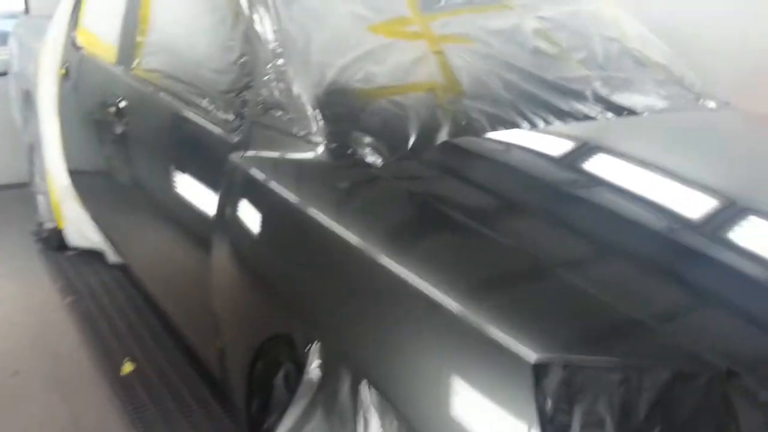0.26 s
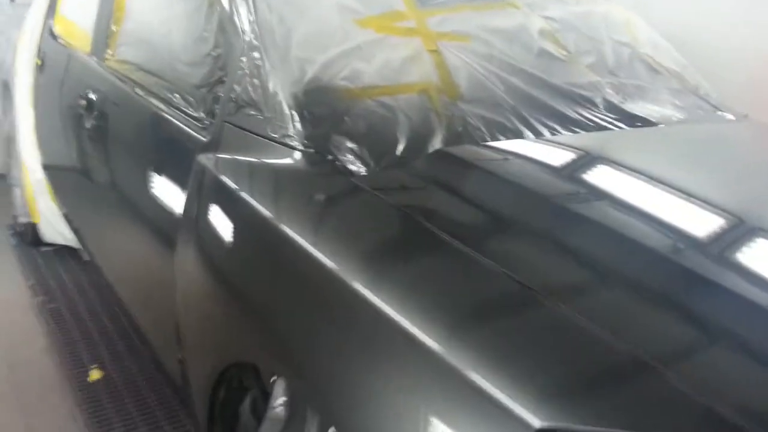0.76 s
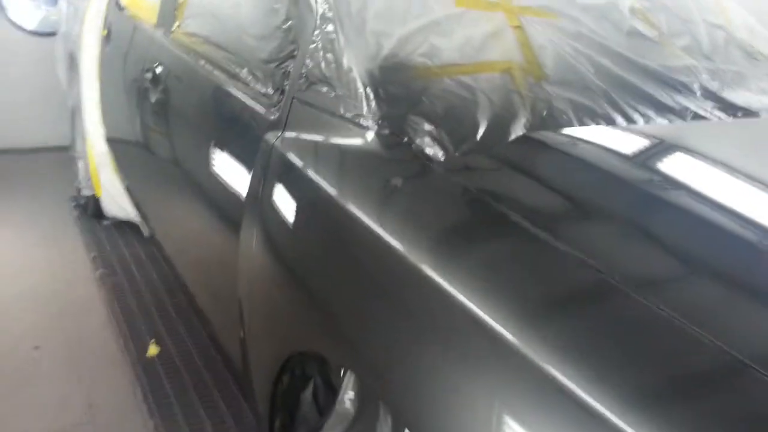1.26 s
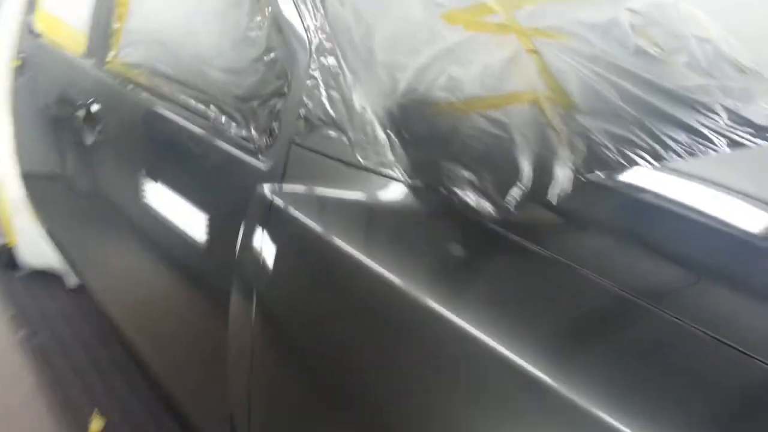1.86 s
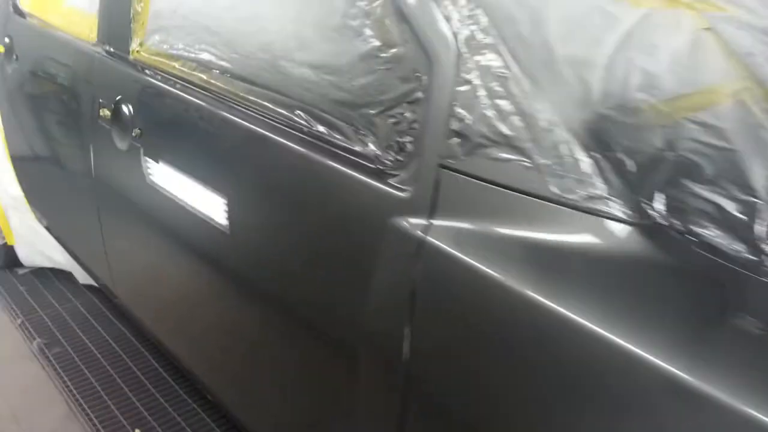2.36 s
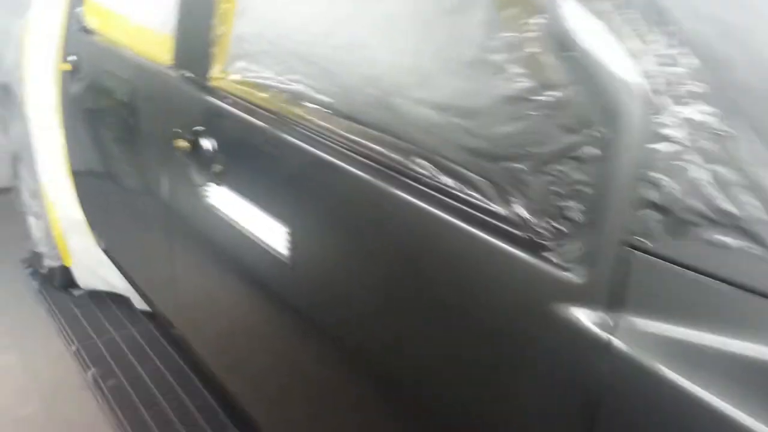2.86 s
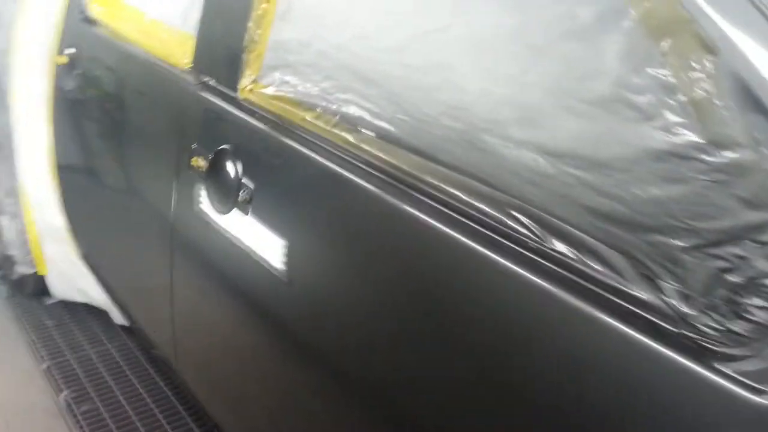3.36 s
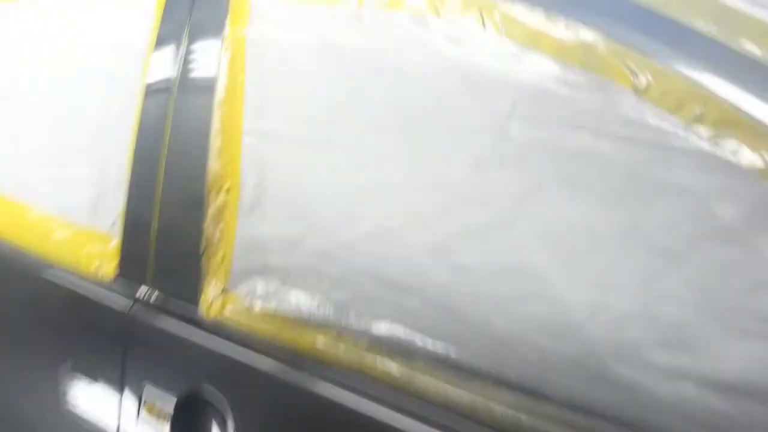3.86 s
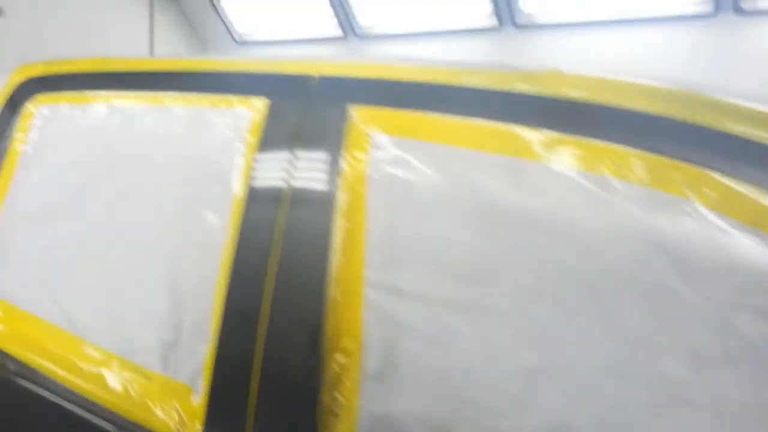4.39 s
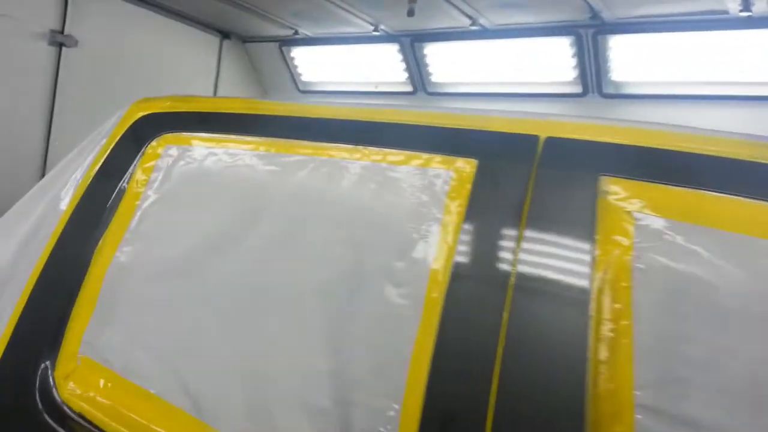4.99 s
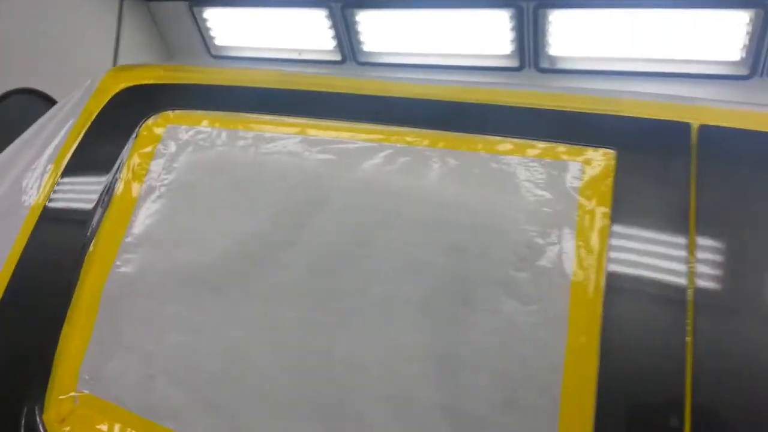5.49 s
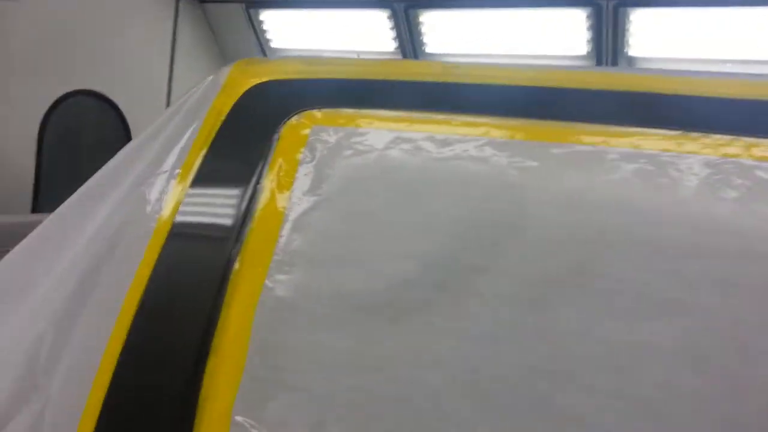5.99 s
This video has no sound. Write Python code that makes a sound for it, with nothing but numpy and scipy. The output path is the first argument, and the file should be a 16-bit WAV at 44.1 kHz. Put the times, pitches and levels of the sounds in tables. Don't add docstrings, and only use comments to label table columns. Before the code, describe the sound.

A steady, loud, dull rush of ventilation air with a wavering low hum fills a spray booth; one sharp plastic click near the start.

```python
import sys
import numpy as np
from scipy import signal
from scipy.io import wavfile
from scipy.ndimage import uniform_filter1d

SR = 44100
rng = np.random.default_rng(int(sys.argv[2]) if len(sys.argv) > 2 else 0)


def nominal_scale(level):
    x = np.asarray(level, float) / 20
    return 10 ** x


def generate_wav(signal):
    frames = np.transpose(np.atleast_2d(signal))
    scaled = np.clip(frames, -1, 1) * 32767
    pcm = np.round(scaled).astype(np.int16)
    wavfile.write(sys.argv[1], SR, pcm)


N = 275184

# start_s [s], level_db [dB]
CLICKS = [
    (.1928, -19),
    (.1976, -2),
]


def evened(x):
    return x / np.sqrt(np.mean(x ** 2) + 1e-20)


def read(hz, f, value):
    return np.interp(np.log(hz + 1), np.log(np.asarray(f) + 1), value)


def add(mix, start_s, sound):
    part = mix[round(start_s * SR):][:len(sound)]
    part += sound[:len(part)]


def resonate(x, hz, width_hz):
    turn = np.exp(2j * np.pi * hz * np.arange(len(x)) / SR)
    r = np.exp(-np.pi * width_hz / SR)
    once = signal.lfilter([1 - r], [1, -r], x / turn)
    twice = signal.lfilter([1 - r], [1, -r], once)
    return 2 * (turn * twice).real


def rush(level_db=-15, patchy_db=1.16, flutter_db=0.4):
    # freq_hz [Hz], density_db [dB per Hz]
    left_air = [(15, -80), (32, -75), (55, -56.5), (100, -50.5), (150, -44), (300, -40), (500, -45),
                (850, -46), (1100, -50), (1900, -57), (3100, -77.5), (4000, -82), (7000, -83),
                (11000, -113.5), (12500, -126)]
    right_air = [(15, -75), (32, -72), (55, -51), (100, -51), (150, -41.5), (300, -42), (500, -47),
                 (750, -48), (1100, -54.5), (2000, -66), (3200, -78), (5000, -85), (8000, -87.5),
                 (11000, -99), (12500, -118)]
    # peak_hz [Hz], width_hz [Hz]
    cavities = [(5600, 2180), (7500, 1560)]
    # freq_hz [Hz], likeness [0-1], right_lead_rad [rad]
    pair = [(30, .99, -.2), (130, .99, -.1), (250, .95, -.05), (350, .83, 0), (500, .6, .3), (650, .7, .35),
            (850, .38, .7), (1100, .3, 1.5), (1500, .43, 3.1), (1950, .12, 4.5), (2300, .27, 6.1),
            (2800, .1, 7.5), (3400, .17, 9.4), (4500, .05, 12)]
    # time_s [s], height [0-1]
    height = [
        (0, 0.4),
        (1.5, 0.58),
        (2.5, 0.72),
        (3.7, 0.88),
        (4.5, 0.86),
        (6.24, .95),
    ]
    # freq_hz [Hz], gain_db [dB]
    shade = [(70, -3), (240, 2.4), (600, -4), (1200, -2.5), (2200, -4.5), (6000, -3.5)]

    frames, hz = N // 512 + 5, np.fft.rfftfreq(2048, 1 / SR)
    t_s = np.arange(frames) * 512 / SR
    a, b, c, d, patches = rng.standard_normal((frames, 1025, 5)).T
    patches = uniform_filter1d(patches, size=6, axis=0)
    patches = evened(uniform_filter1d(patches, size=16, axis=1))
    flutter = evened(uniform_filter1d(rng.standard_normal(frames), size=2))

    lowness = .5 - np.interp(t_s, *np.transpose(height))
    walk_db = np.outer(read(hz, *np.transpose(shade)), lowness)

    f, like, lead_rad = np.transpose(pair)
    like = np.clip(read(hz, f, like), 0, 1)[:, None]
    lead = np.exp(1j * read(hz, f, lead_rad))[:, None]
    left = a + 1j * b
    right = like * lead * left + np.sqrt(1 - like ** 2) * (c + 1j * d)

    air = nominal_scale(np.array([read(hz, *np.transpose(table)) for table in (left_air, right_air)]))
    cavity = np.array([1 / abs(1 - (hz / peak_hz) ** 2 + 1j * hz * width_hz / peak_hz ** 2)
                       for peak_hz, width_hz in cavities])
    treble = np.clip(hz / 5000, 0, 1)[:, None]
    gain_db = walk_db + patchy_db * patches + flutter_db * treble * flutter
    spectra = np.array([left, right]) * (air * cavity)[:, :, None] * nominal_scale(gain_db)
    sound = signal.istft(spectra, nperseg=2048, noverlap=1536)[1][:, :N]
    return nominal_scale(level_db) * evened(sound)


def hum():
    # freq_hz [Hz], width_hz [Hz], rest_db [dB between antinodes]
    modes = [(160, 16.6, -38.5), (245.5, 26, -43), (632.2, 24.3, -37.5), (828, 25, -44.5),
             (211.6, 15, -38.5), (1236, 79, -46), (371, 32, -38), (734, 44, -42.5)]
    # centre_s [s], half_s [s], level_db [dB]
    antinodes = [
        [(.4, 0.53, -27.5), (.95, 0.13, -29.5), (2.5, 0.34, -26), (3.9, 0.56, -27), (5.05, 0.22, -21.5),
         (5.8, .3, -28)],
        [(1.35, 0.37, -18), (2.45, 0.14, -23), (3.15, 0.34, -17), (4.2, 0.18, -20), (5.8, 0.099, -16)],
        [(.48, 0.1, -25.5), (3.0, 0.22, -33), (4.4, 0.38, -30), (5.1, 0.37, -26.5), (5.7, 0.17, -22)],
        [(.3, 0.19, -31.5), (1.45, 0.21, -26), (3.6, 0.39, -36)],
        [(.15, .2, -24.5), (2.3, 0.31, -20.5), (4.2, 0.35, -25.5), (5.45, 0.067, -21.5)],
        [(3.6, .2, -40), (5.0, 0.31, -33), (6.05, 0.16, -29.5)],
        [(.85, .25, -28.5), (1.8, 0.22, -29), (2.45, 0.18, -28), (5.9, 0.25, -31.5)],
        [(.05, 0.17, -26), (1.0, .25, -24.5), (3.0, 0.46, -27)],
    ]
    t_s, out = np.arange(N) / SR, np.zeros((2, N))
    for (hz, width_hz, rest_db), passes in zip(modes, antinodes):
        both = evened(resonate(rng.standard_normal(N), hz, width_hz))
        apart = evened(resonate(rng.standard_normal(N), hz, width_hz))
        spread = hz / 2500
        level = nominal_scale(rest_db)
        for centre_s, half_s, level_db in passes:
            level = level + nominal_scale(level_db) * np.exp(-((t_s - centre_s) / half_s) ** 2)
        out += level * np.array([both + spread * apart, both - spread * apart])
    return out * nominal_scale(np.array([[.4], [-.6]]))


def clicks():
    # freq_hz [Hz], level_db [dB], t60_s [s]
    ring_left = [(5400, -4, .007), (6100, -4, .006), (9300, -2, .002), (11500, -9, .0012),
                 (4200, -10, .002)]
    ring_right = [(7500, 7, .003), (8400, 0, .0025), (9700, 5, .0018), (4600, 0, .0015), (11800, -2, .001)]
    left_late_s, onset_s = .00015, .00008
    t_s, out = np.arange(800) / SR, np.zeros((2, N))
    onset = 1 - np.exp(-t_s / onset_s)
    for side, ring, late_s in zip(out, (ring_left, ring_right), (left_late_s, 0)):
        snap = sum(nominal_scale(level_db - 60 * t_s / t60_s) * np.sin(2 * np.pi * hz * t_s)
                   for hz, level_db, t60_s in ring)
        for start_s, level_db in CLICKS:
            add(side, start_s + late_s, nominal_scale(level_db) * snap * onset)
    return out


def limiter(dry):
    duck_db = -12.5
    late_s, fall_s, hold_s, rise_s = .001, .004, .0157, .001
    turns_s = CLICKS[-1][0] + np.cumsum([late_s, fall_s, hold_s, rise_s])
    return dry * nominal_scale(duck_db * np.interp(np.arange(N) / SR, turns_s, [0, 1, 1, 0]))


def gain_ticks():
    # start_s [s], level_db [dB]
    events = [
        (.2255, -38),
        (5.1833, -30),
    ]
    out = np.zeros(N)
    for start_s, level_db in events:
        add(out, start_s, nominal_scale(level_db) * np.ones(1))
    return out


def scene():
    return rush() + hum() + clicks()


def roll_off(x):
    return signal.sosfilt(signal.butter(12, 16000, fs=SR, output="sos"), x)


def record(dry):
    mix = np.clip(limiter(dry) + gain_ticks(), -1, 1)
    return roll_off(mix)


dry = scene()
out = record(dry)
generate_wav(out)
```